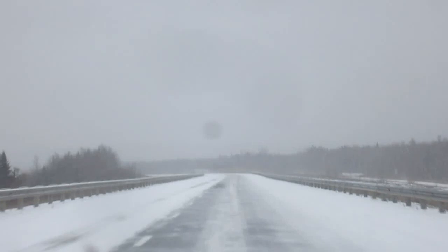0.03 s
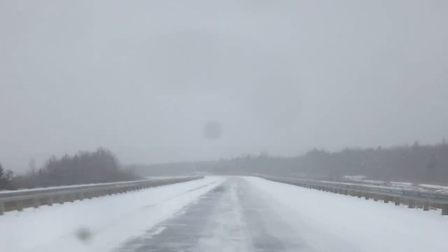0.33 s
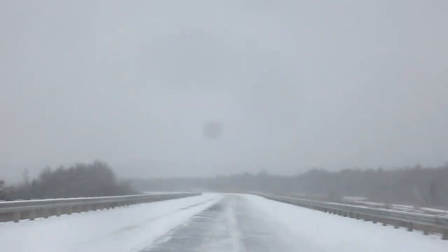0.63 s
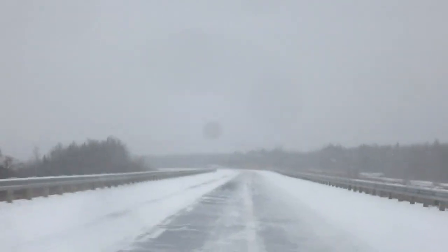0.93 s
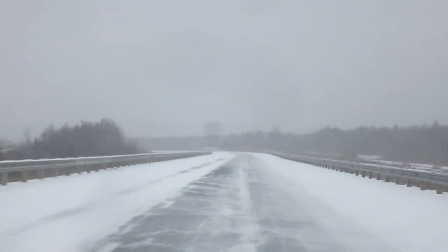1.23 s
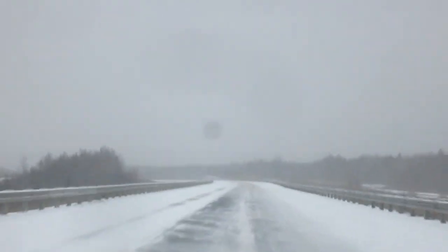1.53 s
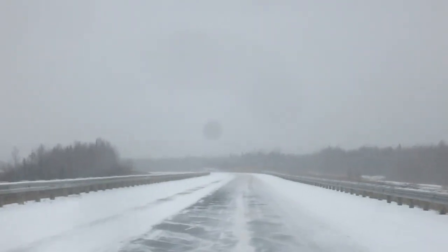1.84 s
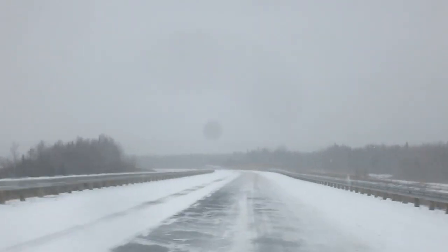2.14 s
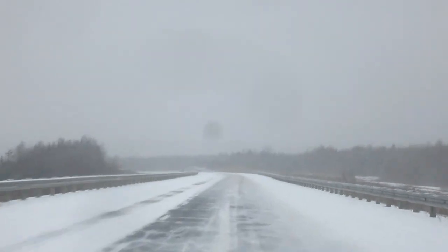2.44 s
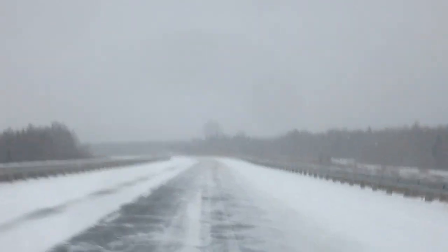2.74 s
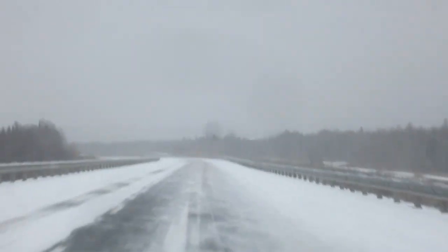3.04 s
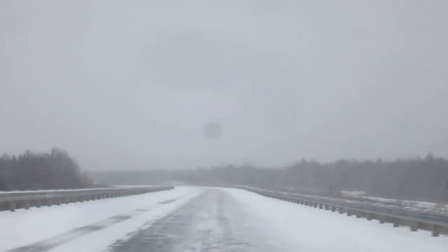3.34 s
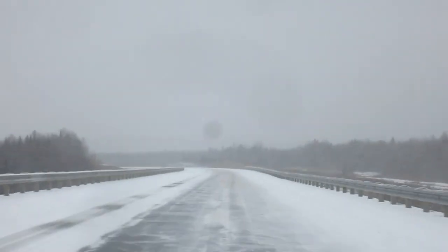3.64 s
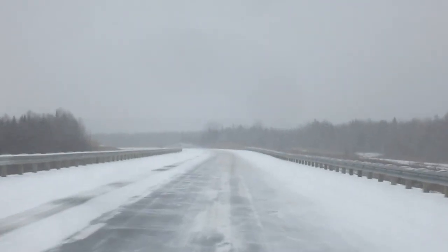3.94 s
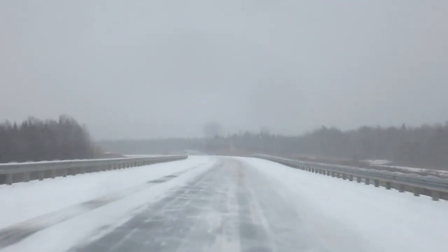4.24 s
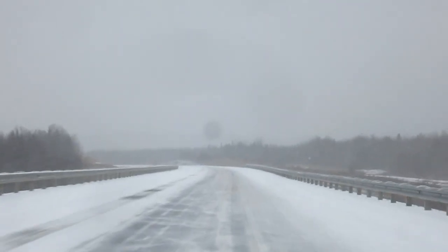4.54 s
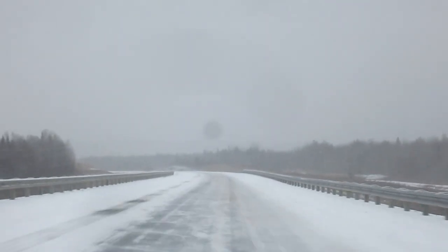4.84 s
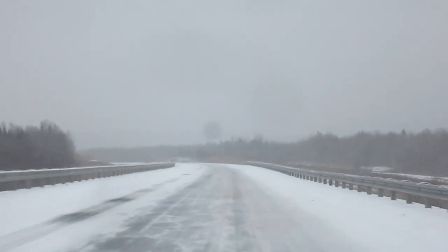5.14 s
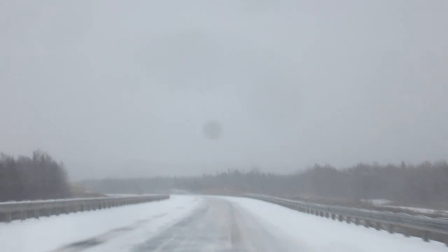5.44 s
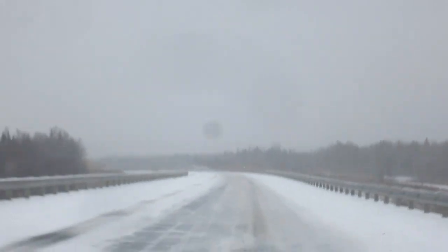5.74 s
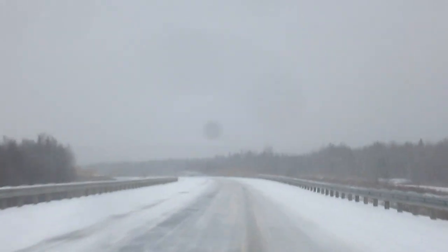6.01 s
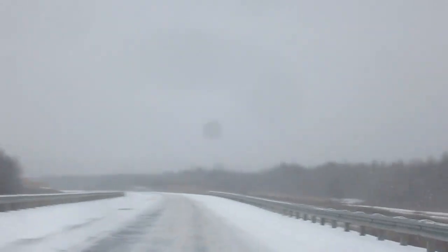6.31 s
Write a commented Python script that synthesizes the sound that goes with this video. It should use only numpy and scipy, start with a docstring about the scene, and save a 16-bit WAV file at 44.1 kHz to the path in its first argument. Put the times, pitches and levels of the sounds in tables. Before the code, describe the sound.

Steady road rumble, tyre roar and wind hiss inside a car on a snowy highway, with a low engine drone and a few faint ticks.

```python
"""Inside a car at steady speed on a snowy highway, one microphone at the front seat.
From the start the road shakes the cabin, the tyres roar, wind hisses at the glass, the engine drones
on two orders, the running gear hums and grit patters faintly. Fine snow sprays the windscreen, the
cabin air booms briefly and short ticks come and go. At 1.6 s something small snaps near the windscreen.
From about 4 s the boom is back; a gust meets the door seals at 5 s, and more snow blows in at 6 s."""
import sys
import numpy as np
from scipy import signal
from scipy.fft import rfft, irfft
from scipy.io import wavfile

SR = 44100
rng = np.random.default_rng(int(sys.argv[2]) if len(sys.argv) > 2 else 0)


def digitize_waveform(pressure):
    """Quantize a signal to 16-bit integers and store it at the path in sys.argv[1].

    Rows of a 2-D input are taken as channels; values are limited to [-1, 1].
    """
    field = np.atleast_2d(pressure).T
    bounded = np.clip(field, -1, 1)
    quanta = np.round(bounded * 32767).astype(np.int16)
    wavfile.write(sys.argv[1], SR, quanta)


N = 289737
TIME = np.arange(N) / SR
FREQS = np.fft.rfftfreq(N, 1 / SR)


def gain_of(db):
    """Decibels to amplitude."""
    return 10 ** (np.asarray(db) / 20)


def unit_rms(x):
    """Scales to rms 1."""
    return x / np.sqrt(np.mean(x ** 2) + 1e-20)


def spectrum_at(points, hz):
    """Reads a spectrum on a log-frequency axis."""
    point_hz, level_db = np.transpose(points)
    return np.interp(np.log(hz + 1), np.log(point_hz + 1), level_db)


def follow(points):
    """A level curve, sample by sample."""
    return np.interp(TIME, *np.transpose(points))


def swells(rows):
    """Level in dB of passing events: each is one arch."""
    return sum(db * np.sin(np.pi * np.clip((TIME - start) / length, 0, 1)) for start, length, db in rows)


def wander(rate_hz):
    """Random drift of rms 1, up to about the given rate."""
    return unit_rms(irfft(rfft(rng.standard_normal(N)) / (1 + (FREQS / rate_hz) ** 4), N))


def below(x, hz):
    """The part of a sound under a frequency."""
    return irfft(rfft(x) / (1 + (FREQS / hz) ** 8), N)


# Air and panel resonances around the microphone: centre_hz, width_hz, gain_db
CABIN_MODES = [(106, 22, 2.2), (228, 55, -1.5), (695, 45, 1.3), (870, 45, 3.6), (1045, 40, -2),
               (1090, 30, 1.6), (1178, 58, 6.3), (1690, 90, -2.6), (1860, 90, 1.6), (2035, 70, -2.8),
               (2135, 80, 2.3), (2305, 60, 2), (2420, 150, 2.8), (3130, 90, 1.8), (3350, 120, 1.8),
               (4600, 400, 2.4), (5050, 220, -1.3), (7800, 500, 1.5)]

def cabin_noise(spectrum):
    """Random forcing heard through the resonances of the cabin, at rms 1."""
    modes_db = sum(db / (1 + (2 * (FREQS - hz) / width) ** 2) for hz, width, db in CABIN_MODES)
    response = gain_of(spectrum_at(spectrum, FREQS) + modes_db)
    return unit_rms(irfft(rfft(rng.standard_normal(N)) * response, N))


# Road rumble coming up through the body: frequency_hz, density_db
RUMBLE_SPECTRUM = [(6, -27), (14, -9), (20, -3.5), (28, -0.8), (40, 0.5), (51, -6.5), (72, 1.5), (98, -0.5),
                   (135, -2.5), (162, -7.5), (305, -5.5), (420, -15.5), (600, -24), (1500, -120)]
# Uneven stretches passing under the car: start_s, length_s, shake_db, rumble_db
UNEVEN_ROAD = [(0, 0.26, 2.5, -1.5), (2.05, 0.75, 2.5, 1.3), (3.15, 0.77, 3.5, 0.5), (3.8, 0.8, 0, 0.3),
               (4.95, 0.71, 0, 0.5)]

def road(level_db=-21.27, bumpy_db=0.5, shake_lift_db=0.6, shake_hz=52):
    """The surface rumbles through the cabin; uneven stretches shift the rumble and the deep shake."""
    start, length, shake_db, rumble_db = np.transpose(UNEVEN_ROAD)
    rumble = gain_of(level_db + bumpy_db * wander(29)) * cabin_noise(RUMBLE_SPECTRUM)
    shake = below(rumble, shake_hz)
    shake_gain = gain_of(shake_lift_db + swells(zip(start, length, shake_db)))
    rumble_gain = gain_of(swells(zip(start, length, rumble_db)))
    return shake_gain * shake + rumble_gain * (rumble - shake)


# The tyres as heard from inside the cabin: frequency_hz, density_db
ROAR_SPECTRUM = [(10, -80), (200, -56), (330, -8), (420, -0.2), (570, 0), (700, -5.5), (820, -9),
                 (1050, -12), (1400, -18.5), (1750, -24), (2600, -27), (6000, -100)]
# Tread roar along the highway: time_s, gain_db
TREAD_CURVE = [(.1, 0), (.97, -0.1), (1.11, 2.5), (1.35, -0.5), (1.62, 0.5), (1.78, -0.5), (2.3, -0.1),
               (2.48, 0.5), (2.78, -2), (3.42, -0.3), (3.95, -0.1), (4.6, -0.3), (4.93, -2), (5.4, 1.5),
               (5.6, -1), (5.76, -0.2), (6.05, -1.5), (6.4, 0)]

def tyres(level_db=-29.5, patchy_db=0.56):
    """Tread roar swells over patches of bare road and packed snow."""
    roar_db = level_db + follow(TREAD_CURVE) + patchy_db * wander(21)
    return gain_of(roar_db) * cabin_noise(ROAR_SPECTRUM)


# Wind at the glass and door seals, close to the microphone: frequency_hz, density_db
WIND_SPECTRUM = [(880, -7), (1500, 1), (2010, -3), (2400, -4.5), (3300, -7), (4500, -12.5), (5200, -16.5),
                 (6700, -21.5), (7800, -21.5), (10500, -25), (12200, -29.5), (13000, -33.5), (15700, -39)]
# Strength of the airflow over the glass: time_s, gain_db
AIRFLOW_CURVE = [(.25, 1.5), (.9, 0.3), (2.55, 0.64), (3.3, -0.3), (3.51, -2), (3.85, 0.9), (4.93, -0.5),
                 (5.1, 1), (5.42, 0.3), (5.62, 0.5), (6.5, 1)]
# Fine snow against the windscreen, just ahead: start_s, length_s, gain_db
SNOW_SPRAY = [(.08, 0.35, 1.5), (5.9, .55, 1)]
# A gust on the door seals: start_s, length_s, gain_db
SEAL_GUSTS = [(4.98, .6, 1.6)]

def wind(level_db=-38.5, flutter_db=0.76, split_hz=5700, top_db=-0.6, top_follow=1.3):
    """Turbulent hiss follows the airflow, its top more so; a gust lifts the low part, snow the top."""
    flow_db = follow(AIRFLOW_CURVE)
    hiss = gain_of(level_db + flutter_db * wander(26)) * cabin_noise(WIND_SPECTRUM)
    low = below(hiss, split_hz)
    low_gain = gain_of(flow_db + swells(SEAL_GUSTS))
    top_gain = gain_of(top_db + top_follow * flow_db + swells(SNOW_SPRAY))
    return low_gain * low + top_gain * (hiss - low)


# Engine drone reaching the front seat: crank_multiple, level_db
ENGINE_ORDERS = [(3, -34.6), (5, -36)]

def engine(crank_hz=59.86, sag_hz_per_s=0.062, jitter=0.0015, lift_db=0.16, load_db=0.65, waver_db=1.4):
    """Two orders of the slowly sagging crank drone; they swell together with load and waver apart."""
    turns = np.cumsum((crank_hz - sag_hz_per_s * TIME) * (1 + jitter * wander(3.96))) / SR
    shared_db = lift_db + load_db * wander(0.96)
    drone = np.zeros(N)
    for order, level_db in ENGINE_ORDERS:
        amplitude = np.sqrt(2) * gain_of(level_db + shared_db + waver_db * wander(7))
        drone += amplitude * np.sin(2 * np.pi * (order * turns + rng.random()))
    return drone


def driveline(pitch_hz=70, level_db=-37.5, waver_db=2, jitter=0.0094):
    """A low hum from the running gear under the floor swells and fades."""
    turns = np.cumsum(pitch_hz * (1 + jitter * wander(4))) / SR
    return np.sqrt(2) * gain_of(level_db + waver_db * wander(1.7)) * np.sin(2 * np.pi * turns)


# What a tick rings with: frequency_hz, density_db
TICK_SPECTRUM = [(900, -25), (2200, -7), (3250, 2.8), (4300, -4), (5450, -2.5), (7200, -14.5), (9300, -4),
                 (11000, -9), (14000, -9.5), (16000, -15)]

def tick(centre_hz, spread_octaves, t60_s, snap=4.6, cabin_db=-18, cabin_t60_s=0.043):
    """One tick: a sharp snap, a short hard chatter, then the brief ring of the cabin."""
    t = np.arange(4096) / SR
    hz = np.fft.rfftfreq(len(t), 1 / SR)
    chatter = np.exp(-np.log(1000) * t / t60_s)
    cabin_ring = gain_of(cabin_db) * np.exp(-np.log(1000) * t / cabin_t60_s)
    force = (chatter + cabin_ring) * rng.choice([-1, 1], len(t))
    force[0] = snap
    band = np.exp(-0.5 * (np.log2((hz + 1) / centre_hz) / spread_octaves) ** 2)
    colour = unit_rms(gain_of(spectrum_at(TICK_SPECTRUM, hz)) * band + 1e-3)
    # the ring comes only after the snap: minimum phase
    log_gain = np.log(np.concatenate([colour, colour[-2:0:-1]]))
    response = np.exp(np.conj(signal.hilbert(log_gain)))[:len(hz)]
    return irfft(rfft(force) * response)


def grit(level_db=-63.5, hits_per_s=200, spread_db=5, sizes=12):
    """Ice grains patter faintly on the body outside; smaller grains ring higher and softer."""
    patter = np.zeros(N)
    for centre_hz in np.geomspace(4400, 12500, sizes):
        hits = rng.random(N) < hits_per_s / sizes / SR
        strength = gain_of(spread_db * np.minimum(rng.exponential(1, N), 3))
        grain = tick(centre_hz, spread_octaves=0.25, t60_s=0.01)
        patter += signal.oaconvolve(hits * strength, grain)[:N] / centre_hz
    return gain_of(level_db) * unit_rms(patter)


# Boom of the air around the microphone: time_s, level_db
BOOM_CURVE = [(.1, -43), (.45, -26.5), (1.1, -38), (3.7, -32.5), (4.1, -30), (5.05, -29), (5.65, -26),
              (6.1, -30.5), (6.5, -40)]

def cabin_boom(pitch_hz=109, waver_db=1.0, jitter=0.006):
    """The cabin air booms on one low, drifting note: briefly at first, longer on the later stretch."""
    turns = np.cumsum(pitch_hz * (1 + jitter * wander(2.06))) / SR
    level_db = follow(BOOM_CURVE) + waver_db * wander(1.9)
    return np.sqrt(2) * gain_of(level_db) * np.sin(2 * np.pi * turns)


# Single ticks heard at the front seat: start_s, level_db, centre_hz, spread_octaves, t60_s
SHORT_TICKS = [(0.2187, -51, 13000, .35, .012), (0.7262, -36.5, 3000, .9, .018),
               (0.7268, -44, 6300, .16, .012), (1.6353, -24.9, 6800, 2.3, .014),
               (2.1905, -55, 14500, .25, .015), (2.2948, -43, 6400, .18, .012),
               (2.3198, -30.5, 3100, .4, .014), (2.3202, -44, 6400, .22, .012),
               (2.4862, -49, 9000, .45, .012), (2.917, -51, 10000, .35, .025),
               (3.0812, -38.7, 7800, .22, .005), (3.7990, -46.7, 8000, .35, .025),
               (4.6785, -34.3, 3700, .45, .006), (5.1002, -44.5, 8000, .35, .015),
               (5.7222, -45, 7200, .25, .015), (6.0347, -43, 6200, .25, .02),
               (6.1773, -42.3, 6400, .22, .012), (6.2497, -44, 6500, .24, .016),
               (6.4515, -53, 14000, .3, .009)]

def short_ticks():
    """Short ticks sound through the noise, three faint and very high; the loudest is a sharp snap."""
    out = np.zeros(N)
    for start_s, level_db, centre_hz, spread_octaves, t60_s in SHORT_TICKS:
        sound = gain_of(level_db) * tick(centre_hz, spread_octaves, t60_s)
        part = out[round(start_s * SR):][:len(sound)]
        part += sound[:len(part)]
    return out


def scene():
    """Everything heard from the front seat, in mono."""
    return (road() + tyres() + wind() + engine() + driveline() + grit() + cabin_boom() + short_ticks())[None]


def record(dry):
    """The microphone opens just after the start and loses the highest treble."""
    open_s, edge_hz = 0.057, 15750
    opened = dry * np.clip((TIME - open_s) * SR / 32, 0, 1)
    lowpass = signal.firwin(511, edge_hz, window=("kaiser", 9), fs=SR)
    return signal.oaconvolve(opened, lowpass[None], "same")


dry = scene()
out = record(dry)
digitize_waveform(out)
```